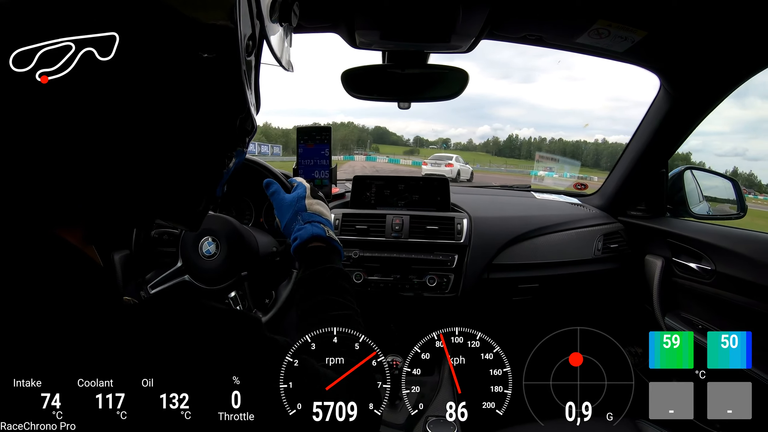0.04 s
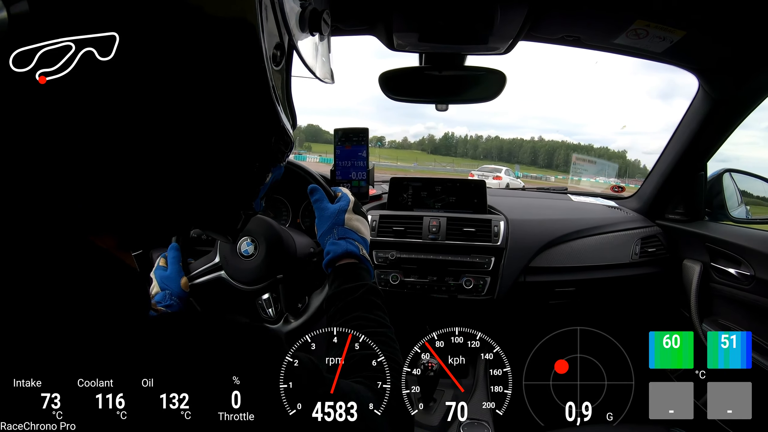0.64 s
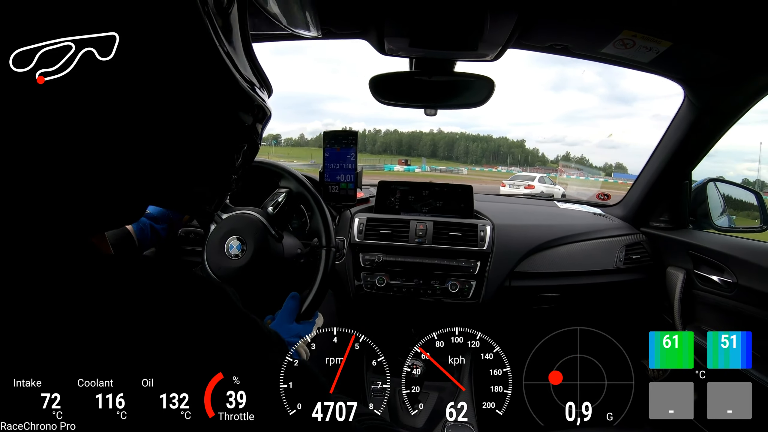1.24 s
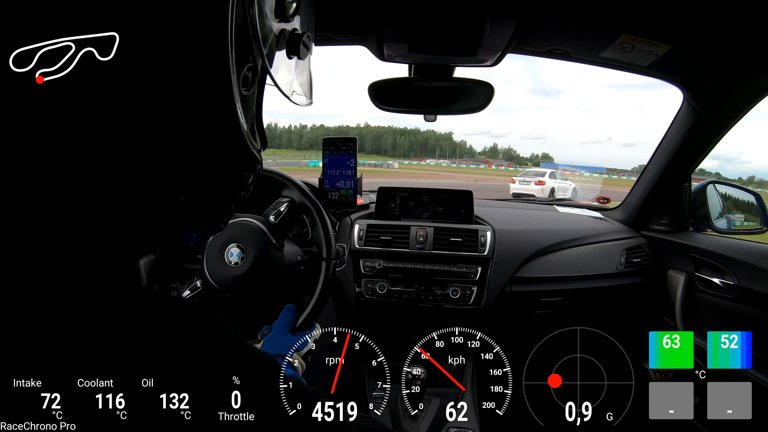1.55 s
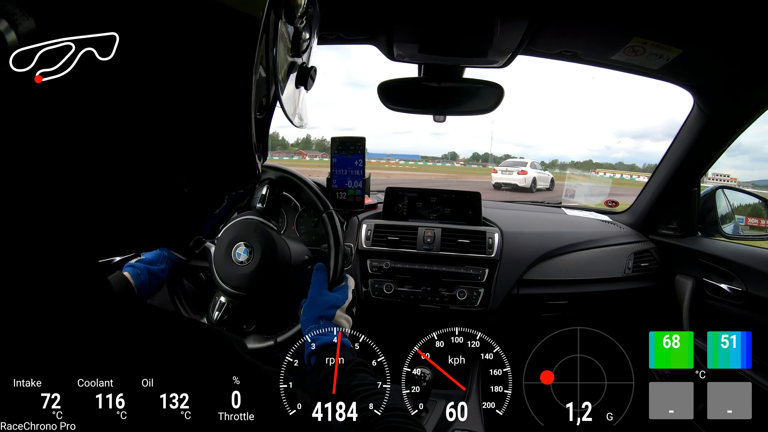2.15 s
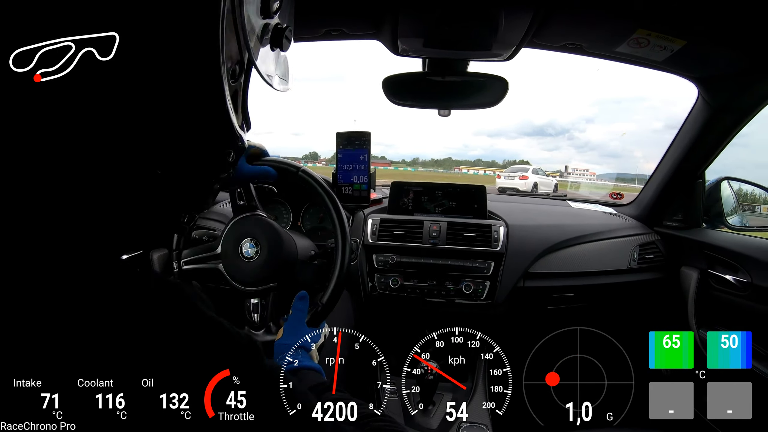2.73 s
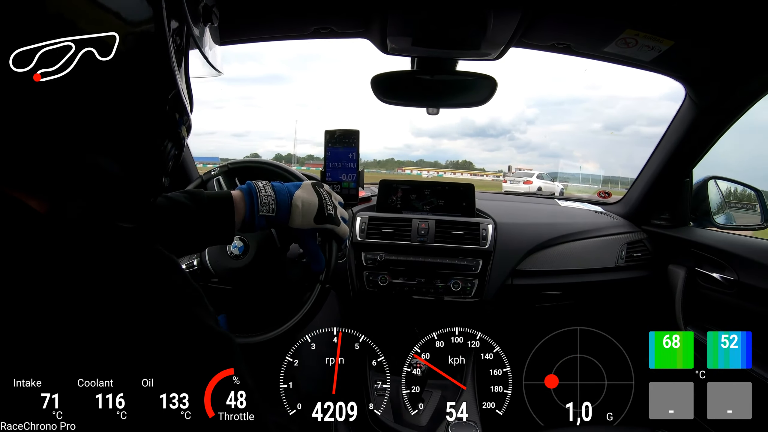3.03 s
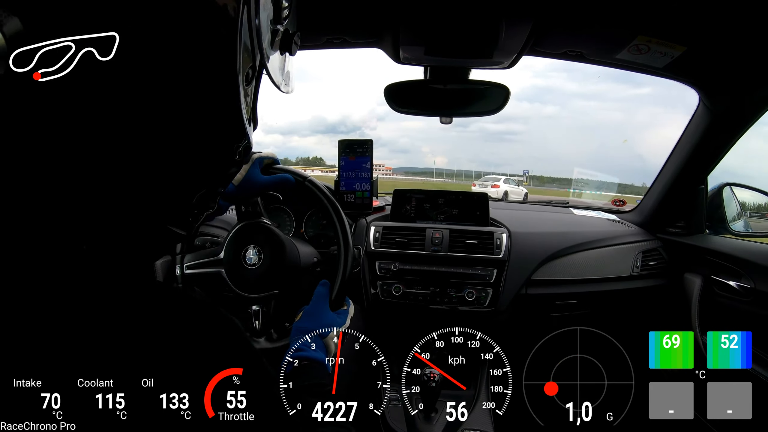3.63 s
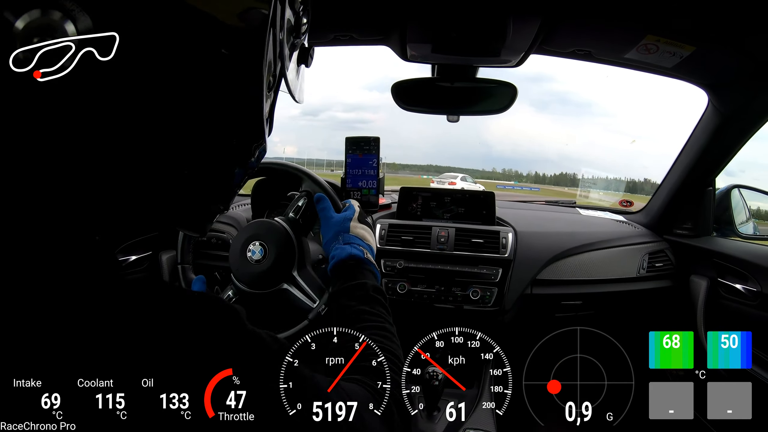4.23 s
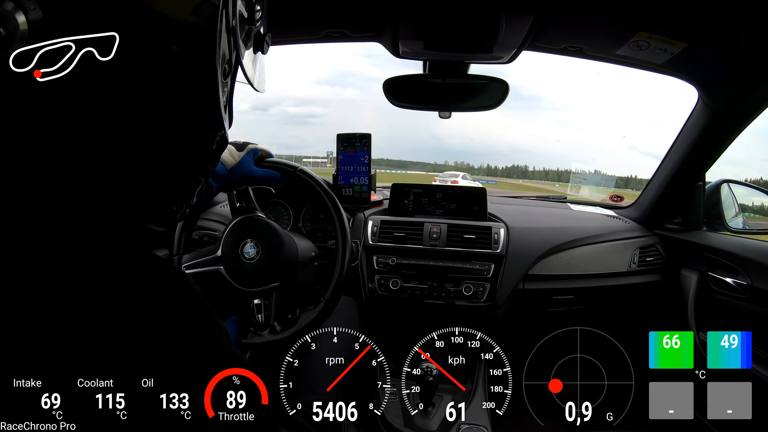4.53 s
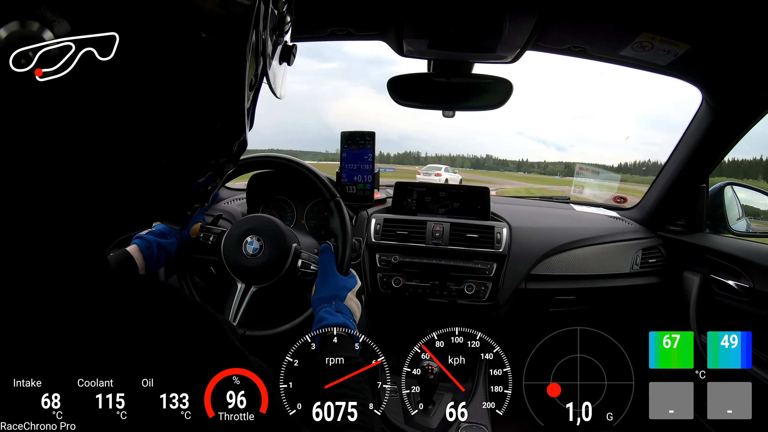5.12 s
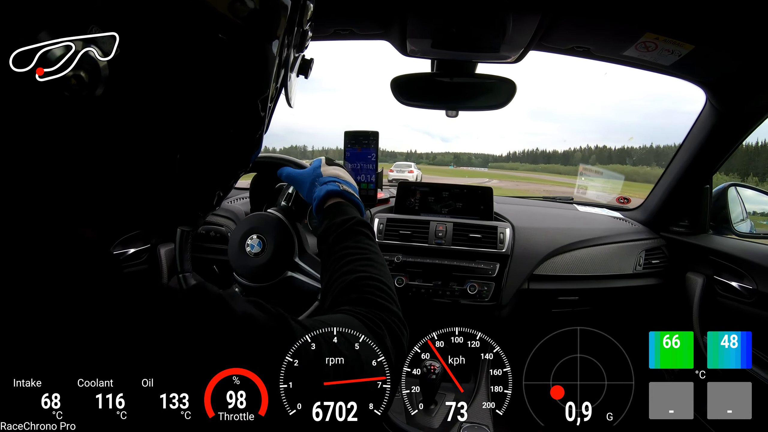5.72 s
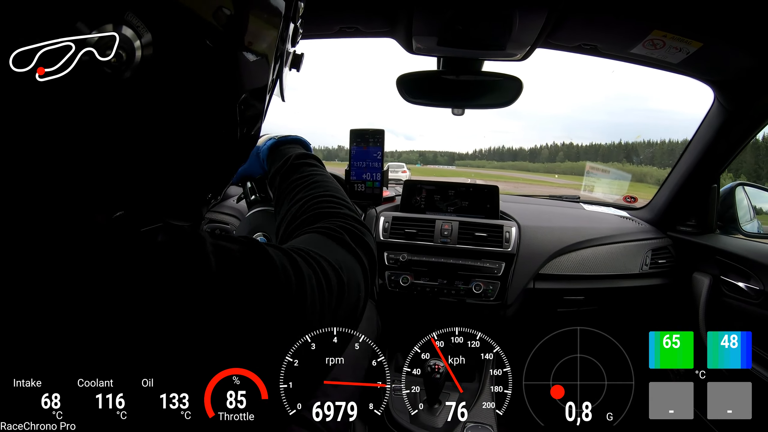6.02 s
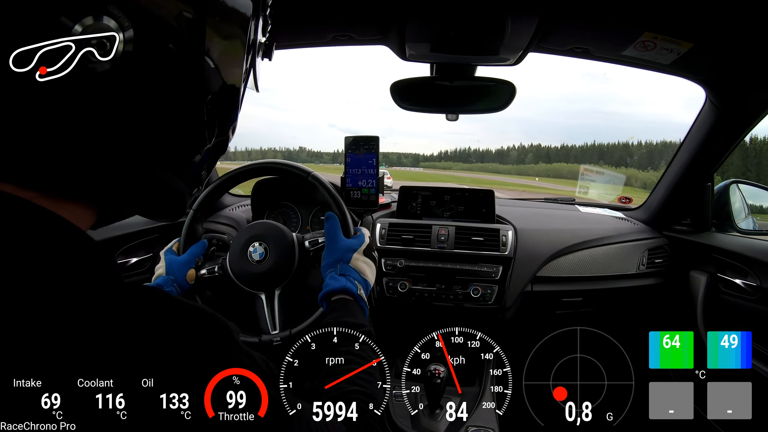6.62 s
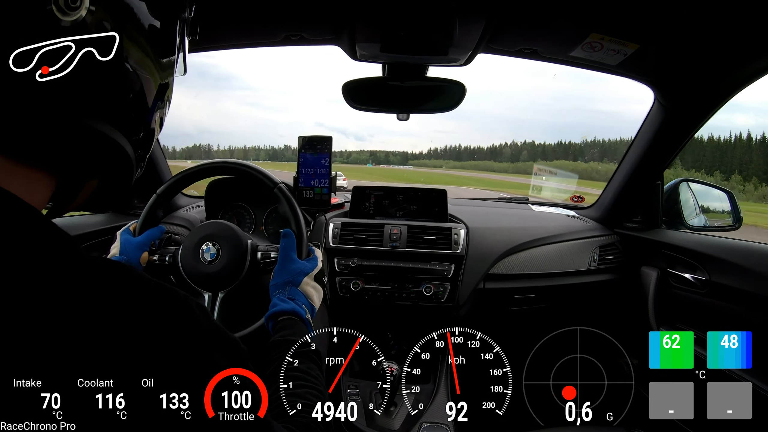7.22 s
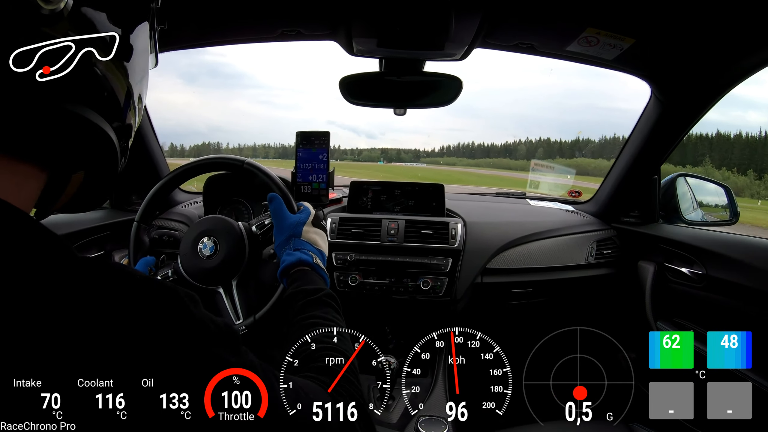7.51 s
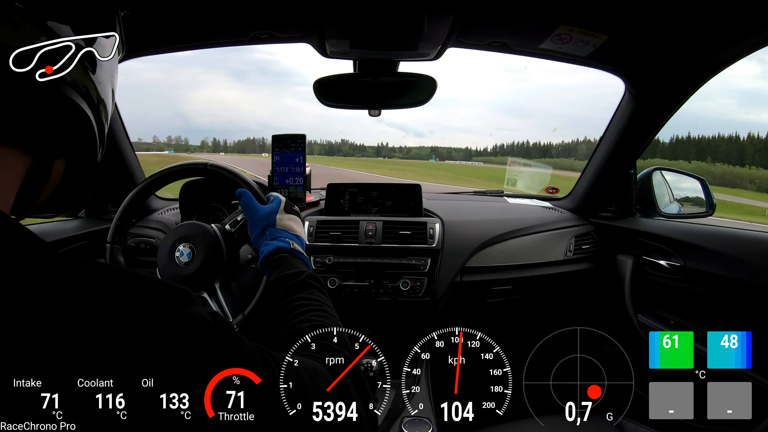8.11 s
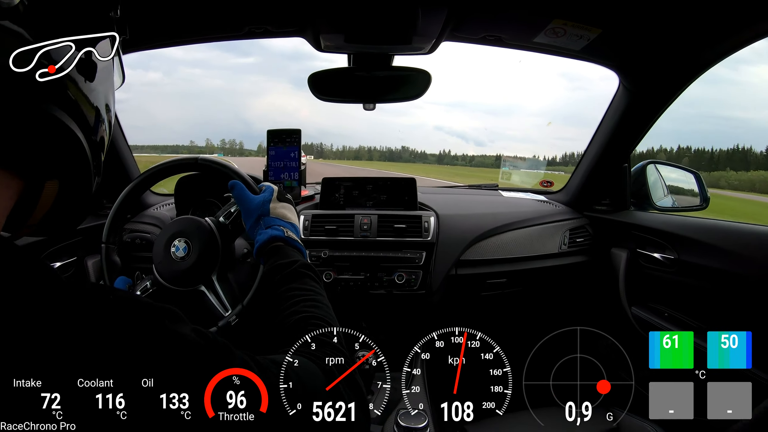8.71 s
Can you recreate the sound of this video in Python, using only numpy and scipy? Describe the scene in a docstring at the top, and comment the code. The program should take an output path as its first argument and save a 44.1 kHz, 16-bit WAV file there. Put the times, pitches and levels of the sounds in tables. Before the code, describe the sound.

A six-cylinder sports car is heard from inside the cabin, over constant low road rumble and roar. In the first second the engine note and a low drone sink as the car brakes, with faint tyre squeals until about 2 seconds. Around 1.3 to 1.7 seconds loose plastic trim knocks, clicks and rattles, with soft thumps from bumps nearby. From 2 to 3 seconds the wheels drum rapidly over a ribbed kerb with a gritty hiss. From about 3.5 seconds the engine swells and climbs, loud and growling, peaking near 6.2 seconds. The tyres scrub and squeal unsteadily from about 3.5 to 7 seconds, over light rattles. At 6.4 seconds an upshift drops the pitch; the engine throbs briefly, then rises slowly again. More trim knocks come around 7.5 seconds, and the tyres scrub lightly near 8.2 as the car pulls on.

```python
"""Inside a sports car on a race track

A six-cylinder car brakes, drums over a ribbed kerb, corners on squealing tyres, shifts up and pulls on.
Each engine note swells as it crosses a pitch at which the cabin rings. The tyres squeal because their
rubber sticks and slips. Road roar fills the cabin, and loose plastic trim rattles, knocks and clicks."""
import sys
import numpy as np
from scipy import signal
from scipy.fft import rfft, irfft, next_fast_len
from scipy.io import wavfile
from scipy.ndimage import uniform_filter1d, minimum_filter1d

SR = 44100
rng = np.random.default_rng(int(sys.argv[2]) if len(sys.argv) > 2 else 0)


def master_out(mix):
    """Clip the mix to full scale and print it as 16-bit PCM to the path in sys.argv[1]."""
    frames = np.transpose(np.atleast_2d(mix))
    ceiling = np.clip(frames, -1, 1)
    pcm = np.round(ceiling * 32767).astype(np.int16)
    wavfile.write(sys.argv[1], SR, pcm)


N = 386316

# loudness of the engine's main firing note, which the tyre hum also follows: t/s, level/dB
FIRING_LEVEL = [(0, -7.5), (.9, -13), (1.301, -4.5), (1.6, -11.5), (2.302, -10), (2.951, -15.5),
                (3.351, -12), (3.65, -8.5), (3.77, -0.5), (3.84, -5.5), (3.92, 3.5), (4.079, 3.5),
                (4.19, -4), (4.35, 3), (4.551, -16), (4.8, -5.5), (5.15, 0.5), (5.75, 3.5), (6.301, 0),
                (6.46, -6), (6.681, 0), (7.1, 1.5), (7.3, 0), (7.62, 2.5), (7.74, -0.5), (8, 3.5),
                (8.24, 2.5), (8.31, -9), (8.45, 1.5), (8.76, -3)]
# noise from the road surface: t/s, body shake/dB, cabin boom/dB, roar/dB, rush/dB
ROAD_LEVELS = [(0, -23.5, -19.5, -34.5, -56.5), (0.851, -23, -19, -36.5, -58),
               (1.1, -26.5, -24.5, -33.5, -53), (1.5, -19, -19, -34, -56.5), (1.85, -28, -18, -32, -60),
               (2.15, -19, -19, -24.5, -50.5), (2.45, -26, -24.5, -26, -49.5),
               (2.8, -21.5, -25.5, -36.5, -56), (3.25, -28.5, -34, -44.5, -71),
               (3.5, -28, -25.5, -39.5, -65.5), (3.65, -28.5, -25.5, -41.5, -60),
               (3.95, -22, -25, -37.5, -65.5), (4.25, -20, -20.5, -36, -60.5),
               (4.9, -20.5, -22.5, -32.5, -60), (5.25, -18.5, -24, -31, -61), (5.9, -20, -22, -32, -62.5),
               (6.5, -18.5, -20.5, -31, -61.5), (7.1, -20, -20.5, -32, -57.5), (7.55, -24, -21, -31, -55.5),
               (8.15, -23.5, -21.5, -30, -58.5), (8.76, -22.5, -20, -30, -55.5)]
# the rush of wind and grit: f/Hz, level/dB
RUSH_SPECTRUM = [(900, -36), (1600, 5), (2300, 3.5), (3300, 2), (5000, -6), (6300, -17), (8000, -19),
                 (10500, -23.5), (12500, -46), (15000, -61)]


def amp(db):
    """Turn decibels into a gain."""
    return 10 ** (np.asarray(db) / 20)


def unit(x):
    """Scale to an average (rms) level of 1."""
    return x / np.sqrt(np.mean(x ** 2) + 1e-20)


def curves(rows):
    """Join a table's points in time: one curve for each column after the first."""
    times, *columns = np.transpose(rows)
    return [np.interp(np.arange(N) / SR, times, column) for column in columns]


def during(start, end, fade):
    """1 from start to end, with soft edges lasting fade seconds."""
    t = np.arange(N) / SR
    return np.clip(np.minimum(t - start, end - t) / fade + .5, 0, 1)


def glide(start, end, start_hz, end_hz):
    """A pitch that slides evenly from start to end."""
    return np.interp(np.arange(N) / SR, [start, end], [start_hz, end_hz])


def wobble(rate):
    """A smooth curve through rate random values a second."""
    smooth = signal.resample_poly(rng.standard_normal(4096), 8, 1)
    return np.interp(np.arange(N) * rate / SR + 10, np.arange(len(smooth)) / 8, smooth)


def coloured(x, spectrum):
    """Filter x by a spectrum (f/Hz, level/dB) and scale it to level 1."""
    size = next_fast_len(N + SR // 4)
    f, db = np.transpose(spectrum)
    hz = np.fft.rfftfreq(size, 1 / SR) + 1
    gain_db = np.interp(np.log(hz), np.log(f), db)
    octaves_outside = np.abs(np.log2(hz / np.clip(hz, f[0], f[-1])))
    return unit(irfft(rfft(x, size) * amp(gain_db - 36 * octaves_outside), size)[:N])


def noise(spectrum):
    """Noise with this spectrum, at level 1."""
    return coloured(rng.standard_normal(N), spectrum)


def turns(hz):
    """Running count of cycles."""
    return np.cumsum(hz) / SR


def tone(cycles):
    """A sine wave at level 1 that starts anywhere in its cycle."""
    return np.sqrt(2) * np.sin(2 * np.pi * (cycles + rng.random()))


def pulses(cycles, scatter_db):
    """One spike a cycle, each of a random size."""
    at = np.flatnonzero(np.diff(np.floor(cycles)))
    train = np.zeros(N)
    train[at] = amp(scatter_db * rng.standard_normal(8192)[:len(at)])
    return train


def cabin_db(hz):
    """How much the cabin boosts or muffles a note of this pitch."""
    response = [(110, -24.5), (140, -18.5), (165, -3.5), (183, -10.5), (205, -1.5), (220, 1), (250, -0.5),
                (272, -0.5), (286, -9), (310, -6), (342, -4), (385, -21), (425, -16.5), (485, -31.5),
                (510, -17.5), (535, -23), (560, -17), (620, -29.5), (680, -18), (740, -26)]  # f/Hz, gain/dB
    f, db = np.transpose(response)
    return np.interp(np.log(hz), np.log(f), db)


def engine():
    """Notes at multiples of the engine's cycle rate; unequal cylinders add a rough exhaust growl."""
    revs = [(0.0, 45.1), (0.31, 41.5), (0.7, 39.3), (1.35, 39.2), (1.7, 38.2), (1.95, 37.4), (2.2, 35.6),
            (3.11, 35.7), (3.62, 38.0), (3.86, 41.9), (4.15, 43.7), (4.4, 43.8), (4.73, 45.3), (5.15, 49.0),
            (5.5, 53.2), (5.84, 57.0), (6.25, 58.3), (6.42, 54.3), (6.6, 42.5), (6.78, 41.2), (7.0, 40.7),
            (7.11, 39.4), (7.25, 39.8), (7.48, 41.9), (7.66, 42.2), (7.9, 44.0), (8.1, 45.5), (8.25, 44.3),
            (8.39, 46.4), (8.76, 46.1)]  # engine speed: t/s, cycle rate/Hz
    cylinders = [1.2, 0.87, 0.69, 0.68, 0.71, 1.1]  # strength of each cylinder
    strong_notes = [(3, -21, 7.5), (5, -23, -3.5), (6, -18.5, 0), (7, -29, -21.5), (12, -20.5, -12.5),
                    (15, -28, 0)]  # multiple, level/dB, gain per octave of engine speed/dB
    offbeat = [(0, -0.5), (.7, -10.5), (.95, 2.5), (1.35, 3.5), (1.801, 3.5), (2.599, -8), (3.2, -11.5),
               (3.38, -1.5), (3.55, 1.5), (3.72, -21.5), (4.3, -8.5), (4.48, 5.5), (4.72, 4.5), (4.921, -6),
               (5.12, 5), (5.7, 3.5), (6.3, 0.5), (6.6, -15), (7.899, 0), (8.35, -17.5)]  # notes that come from unequal cylinders: t/s, level/dB
    growl_notes = [(9, -8.5), (10, -5.5), (11, 2.5), (13, -7), (14, 1.5), (16, -7.5), (17, -6.5),
                   (18, -4.5)]  # weak upper notes: multiple, level/dB
    exhaust_levels = [(0, -43.5, -34), (.9, -44.5, -38), (1.5, -33, -21.5), (2.2, -43.5, -32),
                      (3.2, -44, -32.5), (3.9, -32.5, -27.5), (4.4, -28, -27.5), (4.7, -24, -18.5),
                      (5.2, -41, -30.5), (5.85, -32, -21.5), (6.7, -37.5, -23.5), (7.3, -35, -24.5),
                      (7.752, -32, -17.5), (8.15, -35, -31), (8.5, -28, -17)]  # t/s, pulsing/dB, growl/dB
    pipe_spectrum = [(60, -19), (130, 0.5), (260, 10), (370, -8), (450, -7.5), (520, -3), (600, -14),
                     (680, -3), (750, -12), (870, -6.5), (1400, -20), (2500, -39), (5000, -55.5)]  # the exhaust heard from inside: f/Hz, level/dB
    tick_spectrum = [(3500, -35), (5200, -5.5), (6000, -2.5), (8000, -15.5), (11000, -21), (14000, -50.5)]  # engine tick: f/Hz, level/dB
    (hz,), (firing_db,), (offbeat_db,) = curves(revs), curves(FIRING_LEVEL), curves(offbeat)
    pulsing_db, growl_db = curves(exhaust_levels)
    cycle = turns(hz * (1 + .003 * wobble(25)))
    octaves = np.log2(hz / 44)  # above cruising speed
    count = len(cylinders)
    # after the upshift the notes throb 13 times a second, about once per wheel turn
    throb = amp(-7.5) * during(7.0, 7.65, fade=.31)
    beat = 13 * np.arange(N) / SR
    notes, growl, firings = np.zeros((3, N))
    for multiple, db, growth_db in strong_notes:
        swell_db = offbeat_db if multiple % count else firing_db
        note = (tone(multiple * cycle) + throb * tone(multiple * cycle + beat)) / np.hypot(1, throb)
        level_db = db + growth_db * octaves + swell_db + cabin_db(multiple * hz)
        notes += amp(level_db + 1.8 * wobble(35) + .6 * wobble(8)) * note
    for multiple, db in growl_notes:
        swell = amp(db + cabin_db(multiple * hz) + 3 * wobble(5))
        rasp = 1 + .15 * wobble(45)
        growl += swell * rasp * tone(multiple * cycle)
    shaft = cycle + .0086 / count * wobble(90)  # slightly uneven timing
    for k, strength in enumerate(cylinders):
        imbalance = strength - np.mean(cylinders) + .6 * wobble(14)
        firings += imbalance * pulses(shaft - k / count, scatter_db=1.5)
    exhaust = amp(pulsing_db + 2.9 * wobble(11)) * coloured(firings, pipe_spectrum)
    ticks = coloured(pulses(cycle, scatter_db=2), tick_spectrum)
    rush_db = curves(ROAD_LEVELS)[-1]
    return notes + exhaust + amp(growl_db) * growl + amp(rush_db - 22 + 1.7 * wobble(5.2)) * ticks


def road():
    """The road shakes the body, booms in the cabin and roars in the wheel arches; wind and grit rush."""
    shake_spectrum = [(15, -26), (24, -16), (34, 2), (50, 3.5), (75, 2), (105, -1), (135, -8.5)]  # car body: f/Hz, level/dB
    boom_spectrum = [(70, -47.5), (110, -6.5), (150, 5), (190, 2), (235, 4.5), (275, 4), (310, -2.5),
                     (370, -15.5), (520, -38)]  # cabin air: f/Hz, level/dB
    roar_spectrum = [(230, -28.5), (340, 8.5), (420, 1), (520, 3.5), (610, -2), (680, -3), (745, -7),
                     (840, -3), (1100, -11), (1500, -16), (2200, -30.5), (4000, -55)]  # wheel arches: f/Hz, level/dB
    shake_db, boom_db, roar_db, rush_db = curves(ROAD_LEVELS)
    jolts = np.tanh(noise(shake_spectrum))  # the largest jolts are softened, keeping the low rumble even
    shake = amp(shake_db) * coloured(jolts, [(24, .0049), (120, .0027)])
    boom = amp(boom_db) * noise(boom_spectrum)
    roar = amp(roar_db + wobble(14)) * noise(roar_spectrum)
    rush = amp(rush_db + 1.8 * wobble(40) + 2.1 * wobble(6)) * noise(RUSH_SPECTRUM)
    return shake + boom + roar + rush


def tread_hum():
    """The driven tyres hum at a pitch set by road speed, swelling with the firing note and in the corner."""
    pitch = [(0, 233.2), (.85, 195.6), (3.2, 163.6), (4.5, 205.5), (5.3, 220), (6.4, 247.2), (7.3, 298.9),
             (8.15, 339.8), (8.76, 336)]  # t/s, f/Hz
    (hz,), (firing_db,) = curves(pitch), curves(FIRING_LEVEL)
    corner_db = 9.5 * during(6.05, 6.4, fade=.6)
    db = -27 + firing_db + cabin_db(hz) + corner_db
    return amp(db + 2.5 * wobble(22)) * tone(turns(hz * (1 + .0066 * wobble(20))))


def braking():
    """A low drone sinks as the car slows."""
    drone = [(0, 154, -21), (.09, 151.5, -18), (.21, 145.1, -11), (.29, 145, -26.5), (.45, 146.1, -14),
             (.58, 140.9, -16.5), (.72, 133.2, -15.5), (.81, 120, -21.5), (.88, 119, -37), (.95, 120, -100)]  # t/s, f/Hz, level/dB
    hz, db = curves(drone)
    return amp(db + .87 * wobble(24)) * tone(turns(hz * (1 + .0047 * wobble(30))))


def stick_slip(hz, roughness):
    """Rubber sticks and slips: a rasping, unsteady whistle with a weak octave above it."""
    slips = turns(hz * (1 + roughness * wobble(170)))
    whistle = tone(slips) + amp(-33.5) * tone(2 * slips)
    rasp = 1 + .33 * wobble(190)
    flutter = amp(1.77 * wobble(30))
    return unit(flutter * rasp * whistle)


def sliding_tyres():
    """Tyres scrub sideways, the outer one screeches; brief squeals and their overtones come and go."""
    slide = [(3.3, -65), (3.7, -43), (4.05, -36.5), (4.35, -35), (5.45, -33.5), (6.38, -33.5),
             (6.65, -41.5), (6.95, -37.5), (7.15, -51.5), (7.8, -44.5), (8.25, -36), (8.76, -45.5)]  # sideways scrubbing: t/s, level/dB
    scrub_spectrum = [(650, -28.5), (850, 3.5), (950, -1), (1050, -0.5), (1130, -2), (1260, -3),
                      (1450, -16.5), (1800, -15), (2230, -21.5), (2600, -26.5), (3400, -29.5),
                      (5000, -43.5)]  # sliding rubber: f/Hz, level/dB
    screech = [(4.0, 1170, -100), (4.12, 1174, -43), (4.2, 1171, -31.5), (4.32, 1153, -38.5),
               (4.42, 1161, -26.5), (4.5, 1151, -48), (4.62, 1187, -46.5), (4.72, 1176, -33),
               (4.9, 1155, -32.5), (4.98, 1192, -26.5), (5.06, 1150, -31.5), (5.22, 1173, -27),
               (5.28, 1228, -34), (5.36, 1192, -30.5), (5.43, 1170, -30.5), (5.5, 1182, -27),
               (5.68, 1179, -29.5), (5.78, 1206, -34), (5.85, 1208, -29.5), (5.98, 1162, -27),
               (6.13, 1177, -31), (6.27, 1164, -26), (6.37, 1140, -44.5), (6.62, 1232, -43),
               (6.77, 1153, -44), (6.87, 1148, -38), (6.96, 1173, -32), (7.04, 1231, -45), (7.1, 1225, -63),
               (7.2, 1260, -100)]  # outer tyre: t/s, f/Hz, level/dB
    # squeals and their high overtones: start/s, end/s, start pitch/Hz, end pitch/Hz, level/dB, roughness
    squeals = [(0.127, 0.323, 572, 513, -40.5, 0.011), (0.013, 0.502, 485, 406, -39, 0.013),
               (0.383, 0.762, 834, 815, -39.5, 0.017), (0.762, 1.022, 802, 854, -41.5, 0.025),
               (1.432, 1.901, 542, 528, -39, 0.014), (1.563, 2.035, 832, 835, -37.5, .02),
               (3.056, 3.26, 1490, 1460, -58, 0.022), (3.299, 3.473, 1440, 1486, -50.5, 0.031),
               (3.462, 3.6, 1505, 1510, -44.5, 0.019), (3.489, 3.68, 2300, 2470, -65, 0.024),
               (3.61, 3.845, 1350, 1326, -49, 0.042), (3.855, 4.104, 1368, 1335, -42, 0.026),
               (3.863, 4.1, 2610, 2650, -64, 0.019), (4.238, 4.42, 883, 890, -30, 0.025),
               (4.442, 4.615, 927, 887, -34, 0.023), (4.46, 4.625, 1076, 1072, -43, .016),
               (4.2, 4.715, 1466, 1464, -53.5, 0.0079), (5.033, 5.28, 1310, 1290, -39.5, 0.015),
               (5.343, 5.67, 1104, 1073, -33, .022), (5.688, 6.4, 1035, 1063, -34, .022),
               (5.942, 6.35, 2232, 2230, -52.5, .012), (6.501, 6.633, 1265, 1400, -39.5, 0.03),
               (6.6, 6.895, 1410, 1282, -42, 0.028), (6.653, 7.02, 2404, 2355, -57, 0.017)]
    (slide_db,), (screech_hz, screech_db) = curves(slide), curves(screech)
    sound = amp(slide_db + .37 * wobble(38)) * noise(scrub_spectrum)
    sound += amp(screech_db) * stick_slip(screech_hz, roughness=.011)
    for start, end, start_hz, end_hz, db, roughness in squeals:
        hz = glide(start, end, start_hz, end_hz)
        sound += amp(db) * during(start, end, fade=.13) * stick_slip(hz, roughness)
    return sound


def rattles():
    """Loose plastic snaps against its seat and chatters as it settles; hard hits ring the panel."""
    hits = [(0.598, -43, 0.0032, .08), (1.048, -47.5, 0.0024, 0.21), (1.285, -36.5, 0.0017, 0.13),
            (1.309, -37.5, 0.0027, 0.3), (1.338, -28.5, 0.0035, 0.078), (1.426, -33.5, 0.0044, 0.12),
            (1.607, -42.5, 0.0025, 0.15), (1.66, -39.5, 0.028, 0.13), (1.795, -36, 0.0019, 0.087),
            (1.962, -41, .004, 0.11), (3.15, -52.5, .04, .15), (3.6, -55.5, .02, .25),
            (3.775, -40, 0.035, 0.18), (3.92, -47.5, 0.021, 0.12), (4.19, -49.5, .02, 0.33),
            (4.29, -44.5, 0.03, 0.22), (4.43, -47, .01, 0.1), (4.565, -43.5, 0.012, 0.48),
            (4.84, -48.5, .025, 0.33), (4.94, -50, 0.026, 0.36), (5.03, -46.5, .015, 0.18),
            (5.46, -47, .04, 0.33), (5.55, -46, 0.02, 0.26), (6.079, -43.5, 0.012, 0.18),
            (6.19, -53.5, .01, 0.19), (7.22, -49, .008, 0.18), (7.31, -46, .03, 0.53),
            (7.432, -46.5, 0.006, 0.092), (7.506, -41.5, .004, 0.12), (7.54, -42, .007, .25),
            (7.592, -45, .005, 0.14), (7.648, -42, 0.004, 0.06), (7.84, -43.5, 0.012, 0.25),
            (8.2, -45.5, .02, .12), (8.47, -46, .02, 0.25)]  # t/s, level/dB, rise/s, time to fade by 60 dB/s
    plastic_spectrum = [(380, -6.5), (620, 6.5), (1100, 1), (1550, 10.5), (2400, 3.5), (2950, 6),
                        (3350, -1.5), (3800, 1.5), (4700, 2), (5600, -6), (6600, -13), (8300, -11),
                        (9500, -18), (11500, -21), (14500, -29.5)]  # plastic panels: f/Hz, level/dB
    rub_filter = [(380, -2.5), (3800, 1), (5500, -3), (9000, -5.5), (12000, -11)]  # rubbing sounds duller: f/Hz, gain/dB
    panel_notes = [(1630, -2.5, 0.066), (2360, -4, 0.045), (3280, -0.5, 0.067), (3240, 2.5, 0.16),
                   (4760, -4, 0.05), (5170, -4.5, 0.036)]  # f/Hz, level/dB, time to fade by 60 dB/s
    lead_s, rustles_per_s = .1, 2.4
    t = np.arange(SR // 2) / SR - lead_s
    age = np.maximum(t, 0)
    hardest_db = max(hit[1] for hit in hits)
    # faint rustles come at random times, quieter where the road is smooth
    road_s, *_, rush_db = np.transpose(ROAD_LEVELS)
    jolt_db = rush_db - np.mean(rush_db)
    times = lead_s + np.cumsum(2 * rng.random(64) / rustles_per_s)
    faint = [(s, -59 + np.interp(s, road_s, jolt_db), .012, .12) for s in times if s < N / SR]
    chatter = amp(2.8 * np.clip(wobble(450), -1.5, 1.5) + 2 * np.clip(wobble(70), -1.5, 1.5))
    grains = coloured(rng.standard_normal(N) * chatter, plastic_spectrum)
    dull_grains = coloured(grains, rub_filter)
    snaps, rubs, rings = np.zeros((3, N + SR))
    for s, db, rise_s, fade_s in hits + faint:
        start = round((s - lead_s) * SR)
        span = slice(start, start + len(t))
        contact = rubs if rise_s > .009 else snaps  # slow contacts rub
        contact[span] += amp(db - 60 * age / fade_s) * np.exp(np.minimum(t, 0) / rise_s)
        tuning = 1 + .014 * rng.standard_normal()  # each hit presses the panel differently
        strength = amp(db + .55 * (db - hardest_db))
        for hz, note_db, ring_s in panel_notes:
            fading = amp(note_db + 3 * rng.standard_normal() - 60 * age / ring_s)
            rings[span] += strength * fading * np.sin(2 * np.pi * hz * tuning * age)
    return amp(-5) * (snaps[:N] * grains + rubs[:N] * dull_grains) + amp(-11) * rings[:N]


def bumps():
    """Each bump in the road gives the cabin one soft, low thump."""
    thumps = [(1.125, 131.4, -17.5, 0.017), (1.893, 149.8, -21, 0.062), (5.21, 80.2, -17.5, 0.09)]  # t/s, f/Hz, level/dB, half length/s
    t = np.arange(N) / SR
    return sum(amp(db) * np.exp(-((t - s) / width) ** 2) * tone(hz * t) for s, hz, db, width in thumps)


def knocks():
    """Something loose bumps a hollow panel, a little differently each time."""
    hits = [(1.326, -23), (1.338, -21), (1.372, -25), (1.413, -24.5), (1.426, -24), (1.456, -26),
            (1.626, -22.5), (1.668, -17.5), (7.52, -25), (7.55, -20)]  # t/s, level/dB
    panel_notes = [(540, -8.5, 0.052), (613, -8, 0.11), (664, -5, 0.077), (810, -11, .04),
                   (985, -11, 0.045), (1280, -18, 0.051)]  # f/Hz, level/dB, time to fade by 60 dB/s
    t = np.arange(SR // 5) / SR
    attack = 1 - np.exp(-t / .0013)
    sound = np.zeros(N + SR)
    for s, db in hits:
        for hz, note_db, ring_s in panel_notes:
            fading = amp(db + note_db + 2 * rng.standard_normal() - 60 * t / ring_s)
            tuning = 1 + .023 * rng.standard_normal()
            sound[round(s * SR):][:len(t)] += attack * fading * np.sin(2 * np.pi * hz * tuning * t)
    return sound[:N]


def clicks():
    """Hard edges of the trim meet with a short, bright crack that dies away in the cabin."""
    hits = [(1.339, -32), (1.4226, -33), (1.482, -51.5), (6.638, -54.5), (7.645, -46.5), (7.652, -47.5),
            (8.72, -50)]  # t/s, level/dB
    crack_spectrum = [(1500, -17.5), (3500, 2), (5200, 5.5), (7000, -1), (9000, -7), (11500, -12),
                      (14500, -16.5)]  # f/Hz, level/dB
    t = np.arange(SR // 5) / SR
    crack, echo = amp(-60 * t / .012), amp(-16 - 60 * t / .12)
    loudness = np.zeros(N + SR)
    for s, db in hits:
        loudness[round(s * SR):][:len(t)] += amp(db) * (crack + echo)
    return loudness[:N] * noise(crack_spectrum)


def kerb():
    """Each rib thuds through the suspension and shakes the body panels; grit hisses under the tyre."""
    stretches = [(1.916, 2.083, -19, -29, -45, -77.5), (2.092, 2.645, -13, -27, -23.5, -46.5),
                 (2.618, 3.04, -17.5, -22, -33, -64)]  # start/s, end/s, thud/dB, its octave/dB, clatter/dB, grit/dB
    panel_spectrum = [(130, -16), (250, 11.5), (360, -3.5), (480, -4.5), (620, -15), (900, -10.5),
                      (1300, -32), (2000, -30)]  # f/Hz, level/dB
    thud, octave, clatter, grit = sum(np.outer(amp(levels), during(start, end, fade=.16))
                                      for start, end, *levels in stretches)
    rib_hz = glide(stretches[0][0], stretches[-1][1], start_hz=54.67, end_hz=52.1)
    ribs = turns(rib_hz * (1 + .0065 * wobble(20)))
    thuds = thud * amp(.67 * wobble(40)) * tone(ribs) + octave * tone(2 * ribs)
    blows = coloured(pulses(ribs, scatter_db=1.5), panel_spectrum)
    t = np.arange(SR // 10) / SR
    echo = rng.standard_normal(len(t)) * amp(-60 * t / .14)  # the cabin smears each blow
    panels = clatter * unit(signal.fftconvolve(blows, echo)[:N])
    hiss = grit * amp(1.6 * wobble(60)) * noise(RUSH_SPECTRUM)
    return thuds + panels + hiss


def scene():
    """All the sounds meet at one spot in the cabin, in mono."""
    driving = engine() + road() + tread_hum() + braking() + sliding_tyres()
    return (driving + rattles() + bumps() + knocks() + clicks() + kerb())[None]


def record(dry):
    """A limiter holds the peaks down, both ends fade and the highest treble is cut."""
    ceiling, hold, top_hz = .72, SR // 50, 15000
    safe_gain = np.minimum(1, ceiling / (np.abs(dry) + 1e-9))
    limited = dry * uniform_filter1d(minimum_filter1d(safe_gain, hold), hold)
    t = np.arange(N) / SR
    fades = np.clip(np.minimum(t, t[-1] - t) / .004, 0, 1)
    size = next_fast_len(N + SR // 4)
    below_top = np.fft.rfftfreq(size, 1 / SR) < top_hz
    return irfft(rfft(limited * fades, size) * below_top, size)[..., :N]


dry = scene()
out = record(dry)
master_out(out)
```